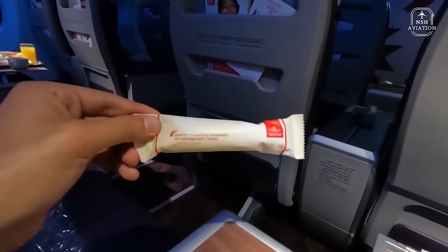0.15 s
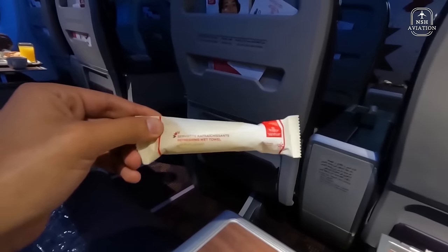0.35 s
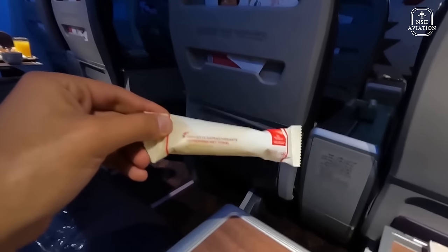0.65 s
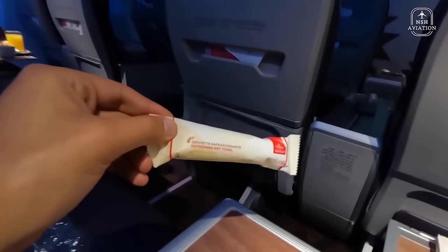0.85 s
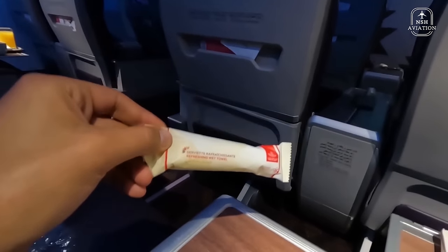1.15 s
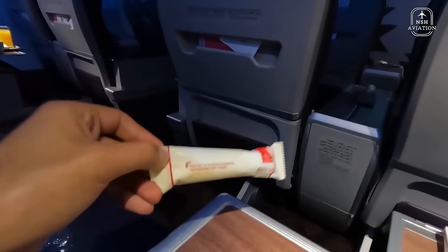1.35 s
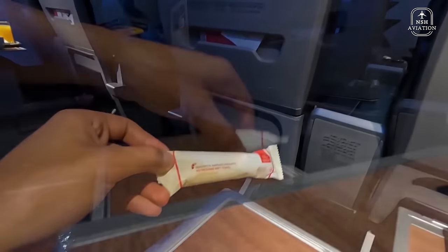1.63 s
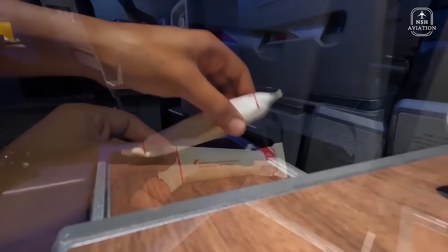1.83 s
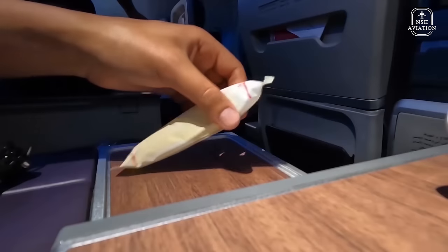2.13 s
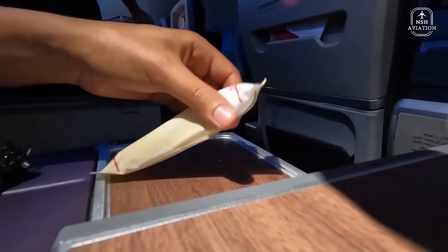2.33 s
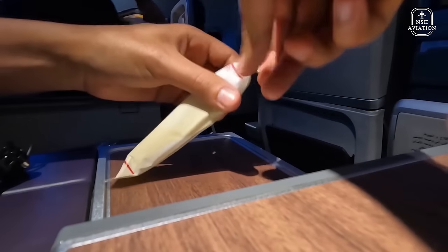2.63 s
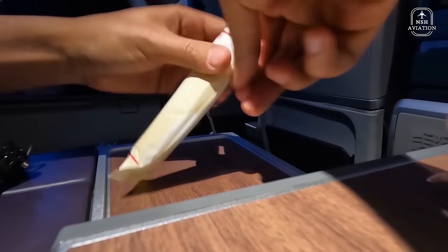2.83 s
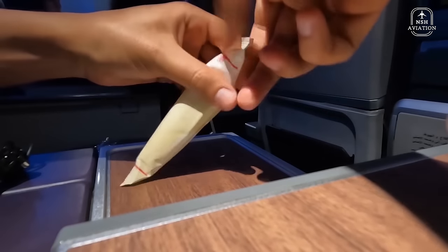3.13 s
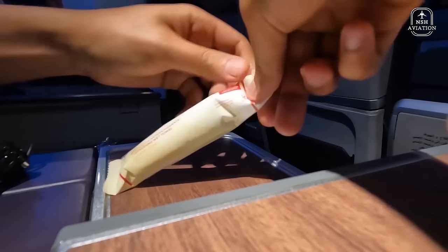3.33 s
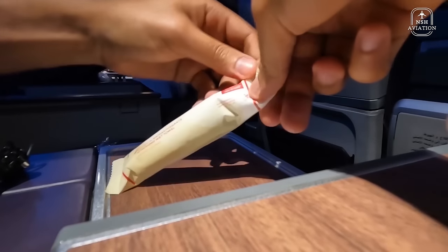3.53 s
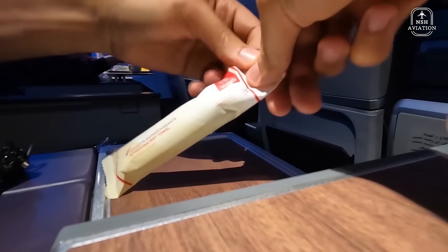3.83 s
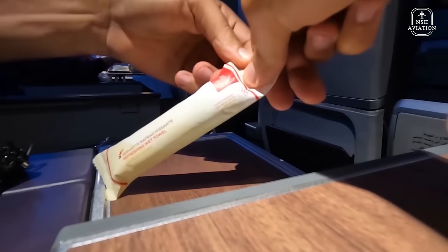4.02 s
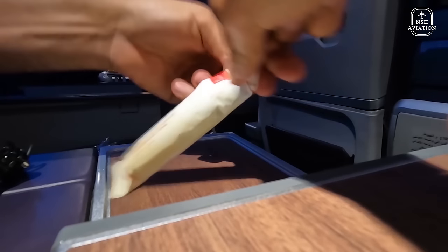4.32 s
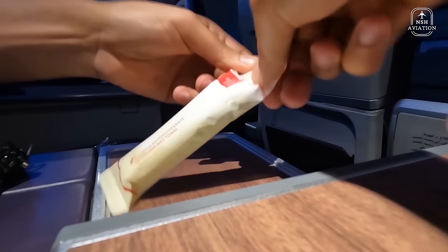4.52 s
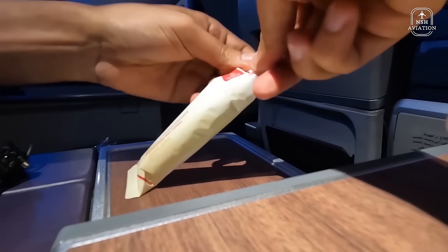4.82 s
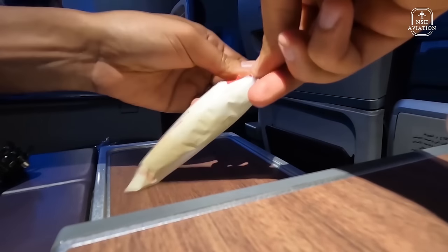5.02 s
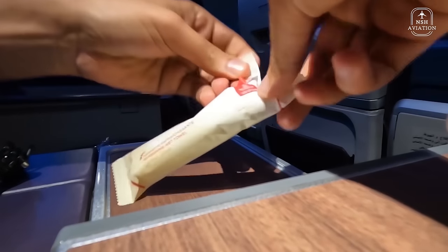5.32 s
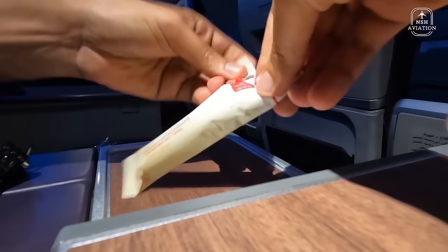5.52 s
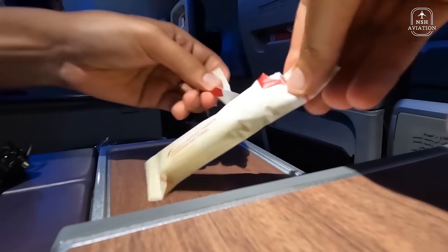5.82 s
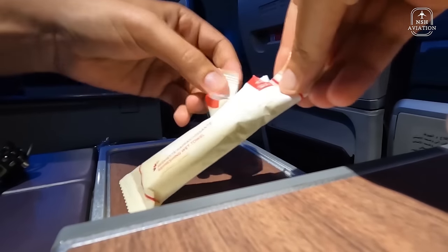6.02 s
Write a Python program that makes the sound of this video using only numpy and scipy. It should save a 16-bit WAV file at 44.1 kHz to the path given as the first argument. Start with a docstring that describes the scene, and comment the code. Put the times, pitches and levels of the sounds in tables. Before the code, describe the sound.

Inside a jet in cruise, a deep, soft air roar and low engine hum run throughout. Close to the microphone, a plastic wrapper gives sparse sharp snaps, then busier crinkling. Near two seconds the wide stereo cabin fades into a quieter centred one, which slowly regains level. Faint cutlery clinks come from seats away, clearest shortly before five seconds.

```python
"""Air roars along the skin of a jet cabin in cruise: noise coloured by the wall, its octave bands swelling and flickering.
Under it an engine shaft hums, a wavering sine. Close by, fingers crackle a plastic wrapper: noise bursts and dense
grains ring in resonances of the film. Some seats away cutlery clinks, in metal modes blurred by rattling.
A wide stereo view fades out near 2 s while a centred view, with the engines turning a little faster, fades in."""
import sys
import numpy as np
from scipy import signal
from scipy.fft import rfft, irfft, next_fast_len
from scipy.io import wavfile
from scipy.ndimage import uniform_filter1d

SR = 44100
rng = np.random.default_rng(int(sys.argv[2]) if len(sys.argv) > 2 else 0)


def log_audio(samples):
    """Write samples as a 16-bit WAV file to the path given in sys.argv[1]."""
    # one column per channel
    frames = np.atleast_2d(samples).T
    # limit to full scale, then quantise
    limited = np.clip(frames, -1, 1)
    pcm = np.round(limited * 32767).astype(np.int16)
    wavfile.write(sys.argv[1], SR, pcm)


N = 271656

# fade of the wide stereo view, whose last row ends it: time_s, level_db
WIDE_VIEW_FADE = [(0, 0), (1.6, -0.5), (1.75, -2.5), (1.87, -7), (1.97, -12.5), (2.0, -55)]
WIDE_VIEW_END_S = WIDE_VIEW_FADE[-1][0]
LEFT_RIGHT = np.array([[1], [-1]])  # side noise enters the two channels with opposite signs


def undb(db):
    """Decibels to gain."""
    return 10 ** (np.asarray(db) / 20)


def over_hz(table, hz, column=1):
    """Read a spectrum on a log-frequency axis."""
    table = np.array(table)
    return np.interp(np.log(np.maximum(hz, 1)), np.log(table[:, 0]), table[:, column])


def fade(table):
    """Gain curve over time, interpolated in decibels."""
    s, db = np.transpose(table)
    return undb(np.interp(np.arange(N) / SR, s, db, left=-120, right=db[-1]))


def walk(rate):
    """Random levels held 1 / rate seconds and smoothed twice; spread near 1."""
    held = int(SR / rate)
    steps = np.repeat(rng.standard_normal(N // held + 1), held)
    smooth = uniform_filter1d(uniform_filter1d(steps, held), held)
    return 1.3 * smooth[:N]


def add(out, sound, s):
    """Mix a short sound in at time s."""
    i = int(s * SR)
    sound = sound[..., :N - i]
    out[:, i:i + sound.shape[-1]] += sound


def band(x, hz, width):
    """One resonance, its width in Hz."""
    return signal.lfilter(*signal.iirpeak(min(hz, .4 * SR), hz / width, SR), x)


def band_twice(x, hz, width):
    """The same resonance twice in a row, for steeper skirts."""
    return band(band(x, hz, width), hz, width)


def roar(colour, db, wide, swell_db=-0.4, flicker_db=0.15, lean_db=3.5):
    """Turbulent air shakes the wall panels; octave bands swell together and flicker alone."""
    # stereo width of the wide view: frequency_hz, diffuse_side_minus_mid_db
    width = [(60, -48), (140, -52.5), (210, -30), (330, -21.5), (500, -8), (1160, -5.5), (2700, -3),
             (8000, 3)]
    size = next_fast_len(N)
    hz = np.fft.rfftfreq(size, 1 / SR)
    tint = undb(over_hz(colour, hz))
    mid = rfft(rng.standard_normal(size)) * tint
    side = rfft(rng.standard_normal(size)) * tint * wide * undb(over_hz(width, hz))
    # the wall is on the left; the bass bends round the microphone body
    lean = undb(wide * lean_db / 2 * hz ** 2 / (hz ** 2 + 450 ** 2))
    ears = np.array([mid * lean + side, mid / lean - side])

    octave = np.log2(np.maximum(hz, 1) / 20)
    swell = walk(0.66)
    out = 0
    for k in range(11):
        share = np.cos(np.pi / 2 * np.clip(octave - k, -1, 1)) ** 2  # overlapping octave bands
        level = undb(swell_db * swell + flicker_db * walk(6))
        out = out + irfft(ears * share, size)[:, :N] * level
    return out * undb(db) / np.sqrt(np.mean(out ** 2))


def shaft(hz, db, waver_db=1.77, drift=0.17):
    """Fan shaft imbalance: a once-per-turn hum carried by the airframe, nearly steady in pitch."""
    turn = 2 * np.pi * (hz * np.arange(N) / SR + rng.random()) + drift * walk(2.61)
    return np.sqrt(2) * undb(db + waver_db * walk(7.6)) * np.sin(turn)


def dips(dip_s=0.024):
    """Gain of the hum, sinking for a moment at each dip."""
    # brief dips of the hum in the centred view: time_s, depth_db
    hum_dips = [(2.47, -2), (2.96, -17), (3.26, -6), (3.46, -11), (3.96, -12), (4.88, -27), (5.56, -5)]
    t = np.arange(N) / SR
    return undb(sum(db * np.exp(-((t - s) / dip_s) ** 2) for s, db in hum_dips))


def cutlery(rise_s=0.0028, blur_hz=220, share_db=2.0):
    """Metal touched some seats away: rings swell, last while it rattles, then die; rattling blurs them into noise."""
    # ringing modes, one list for each piece: frequency_hz, level_db, t60_s
    piece_modes = [
        [(3020, 9.5, 0.05), (3520, -6, 0.09), (5310, 4, 0.12), (7400, -10, 0.18), (9577, -19, .08),
         (10380, -17, 0.116), (11910, -17, 0.13), (14520, -13, .2)],
        [(3650, 3.5, .12), (5330, -4.5, 0.16), (6570, -6, .1), (8940, -17, .1), (10500, -22, .1),
         (11600, -18, .12)],
        [(6665, -6, 0.1), (12000, -24, .08)],
        [(5750, -4, .08), (8600, -3, 0.39), (9800, -9, .2), (10250, -7, .3)],
        [(7950, -0.5, .1), (8600, -5, .1)],
    ]
    # names of the pieces, in the order of those lists
    piece_names = ("first", "second", "third", "fourth", "fifth")
    # rattles: time_s, piece, length_s, level_db (mode levels add to it), roughness from 0 to 1
    clinks = [(2.02, "fifth", .05, -77, .9), (2.16, "fifth", .035, -73, .7),
              (2.328, "second", .01, -70, .6), (2.375, "second", 0.035, -69, 0.5),
              (2.622, "fourth", .01, -71, .6), (2.797, "second", 0.04, -66.5, .45),
              (3.04, "second", 0.061, -64.5, 0.6), (3.69, "fourth", .01, -69, .6),
              (4.827, "first", 0.012, -45.5, 0.5), (4.849, "first", .006, -53, .6),
              (4.876, "first", .01, -56, .6), (5.901, "third", 0.032, -49, 0.8)]
    out, t = np.zeros((2, N)), np.arange(9000) / SR
    blur = int(SR / blur_hz)
    for s, piece, length_s, db, rough in clinks:
        hz, mode_db, t60 = np.array(piece_modes[piece_names.index(piece)]).T[:, :, None]
        gain = undb(db + mode_db + share_db * rng.standard_normal(hz.shape))
        noise = rng.standard_normal((2, len(hz), len(t)))
        real, imaginary = uniform_filter1d(noise, size=blur) * np.sqrt(blur / 2)
        swing = np.sqrt(1 - rough ** 2) + rough * (real + 1j * imaginary)
        decay = np.exp(-np.log(1000) * np.maximum(t - length_s, 0) / t60)
        ring = (1 - np.exp(-t / rise_s)) * decay
        tone = np.exp(2j * np.pi * (hz * t + rng.random(hz.shape)))
        add(out, np.sum(gain * ring * np.imag(swing * tone), axis=0), s)
    return out


def film(push, low_hz, high_hz, high_db, more_body_db=0, body_db=-4, follows=0.93):
    """The plastic film: two rings set by the fold over a broad snap, which is weak where the fold sounds dull."""
    low = band_twice(push, low_hz, 0.44 * low_hz)
    high = band_twice(push, high_hz, 0.26 * high_hz)
    body_gain = undb(body_db + more_body_db + follows * min(high_db, 0))
    return low + undb(high_db) * high + body_gain * band_twice(push, 3300, 4600)


def effort(held_db=-65, press_db_per_s=405, let_go_db_per_s=225.5):
    """Rustle level in dB over time: each squeeze presses quickly, holds and lets go."""
    # fingers squeezing the film: hold_start_s, hold_s, rustle_db
    squeezes = [(0.0, 0.011, -54), (1.393, .01, -57), (1.518, 0.025, -52.5), (1.817, .01, -67),
                (1.955, .01, -71), (2.285, 0.027, -65), (2.616, .03, -69), (2.772, 0.014, -60.5),
                (2.888, .03, -70), (2.948, .02, -74), (3.067, 0.06, -63.5), (3.27, 0.025, -55),
                (3.329, 0.021, -53), (3.40, 0.053, -62.5), (3.828, 0.035, -56), (4.15, 0.032, -63.5),
                (4.42, 0.052, -49.5), (4.602, 0.076, -58), (4.715, .03, -59), (4.83, 0.033, -53),
                (5.006, .01, -57.5), (5.147, 0.045, -57.5), (5.352, 0.062, -57.5), (5.64, 0.06, -58),
                (5.763, 0.072, -53), (5.867, .01, -65), (6.10, 0.044, -69)]
    t = np.arange(N) / SR
    # the wrapper merely held rustles in the wide view only
    power = (undb(held_db) * fade(WIDE_VIEW_FADE)) ** 2 + 1e-12
    for s, hold_s, db in squeezes:
        press = press_db_per_s * np.maximum(s - t, 0)
        let_go = let_go_db_per_s * np.maximum(t - s - hold_s, 0)
        power = power + undb(db - press - let_go) ** 2
    return 10 * np.log10(power)


def rustle(level_db, per_s=1500, scatter_db=2.0, patchy_db=3):
    """Dense tiny creases in three patches of film, each with its own rings."""
    out = 0
    for low_hz, high_hz, high_db in ((2900, 8200, -8.0), (3680, 4600, -12.0), (5200, 7800, -12.0)):
        when, size, sign = rng.random((3, N))
        sizes = undb(-scatter_db * np.log(size + 1e-9))
        grains = (when < per_s / SR) * sizes * np.sign(sign - .5)
        out = out + film(grains, low_hz, high_hz, high_db) * undb(patchy_db * walk(35))
    return undb(level_db) * out / np.sqrt(np.mean(out ** 2))


def creaks(edge_s=0.0032, grain_db=2.5, spread=.5):
    """Stick-slip grains in stretched film feed one narrow ring."""
    # creaks of the film: start_s, length_s, level_db, ring_hz, width_hz
    creak_rows = [(0.004, 0.024, -52.5, 7600, 3000), (0.398, .022, -58, 6000, 2000),
                  (0.447, .015, -56, 8200, 3000), (1.531, .012, -52, 7000, 900),
                  (1.595, .015, -60, 6500, 2500), (1.81, .012, -61, 6500, 2500),
                  (3.257, 0.031, -53, 6960, 800), (3.262, .02, -59, 4800, 500),
                  (3.283, 0.021, -54, 4750, 500), (3.316, .03, -57, 7800, 1200),
                  (3.325, 0.018, -53, 4800, 600), (3.805, .02, -57, 6000, 1800),
                  (3.847, .022, -56, 7600, 1200), (3.874, .012, -59, 5500, 1500),
                  (4.464, .012, -54.5, 7000, 1500), (4.994, .02, -58, 6200, 1200),
                  (5.764, .012, -56, 7200, 1200)]
    out, t = np.zeros((2, N)), np.arange(3000) / SR
    for s, length_s, db, hz, width in creak_rows:
        mid, side, size = rng.standard_normal((3, len(t)))
        grains = mid + (s < WIDE_VIEW_END_S) * spread * side * LEFT_RIGHT
        grain_gain = undb(grain_db * uniform_filter1d(size, size=60) * np.sqrt(60))
        ring = band_twice(grains * grain_gain, hz, width)
        shape = (1 - np.exp(-t / edge_s)) * np.exp(-np.maximum(t - length_s, 0) / edge_s)
        add(out, undb(db) * shape * ring / np.sqrt(np.mean(ring ** 2)), s)
    return out


def strays(level_db, count=400, per_s=45, over_rustle_db=2.5, scatter_db=2.5):
    """Small snaps at random moments, as strong as the fingers press; rows like those of the snaps."""
    when, size, low, high = rng.random((count, 4)).T
    s = np.cumsum(-np.log(when + 1e-9) / per_s)
    rustle_db = np.interp(s, np.arange(N) / SR, level_db)
    db = rustle_db + over_rustle_db - scatter_db * np.log(size + 1e-9)
    low_hz, high_hz = 3000 * (1 + 0.13 * low), 5550 * (1 + 0.2 * high)
    rows = np.transpose([s, db, low_hz, high_hz, -8.5 + 0 * s])
    return list(rows[(s < N / SR) & (db > -72)])


def wrapper(level_db, rise_s=.0004, crack_s=0.0011, kick=12, tail_s=0.009, crinkle_db=-13.5, grain_db=3.5,
            spread=0.3, left_late_s=0.000014, shade_hz=5500, top_hz=9000):
    """A fold buckles with a quick ringing crack and broad grainy crinkles; only the wide view hears them spread out."""
    # wrapper snaps: time_s, crack_peak_db, low_ring_hz, high_ring_hz, high_ring_minus_low_db
    snaps = [(0.0184, -38, 3050, 6200, 10), (0.397, -46, 3060, 6000, 6), (0.4492, -36, 6600, 8700, 0),
             (0.8294, -36, 3150, 5900, -7), (1.1751, -26.5, 6200, 9400, 3), (1.3958, -16.5, 5070, 7000, -3),
             (1.4945, -45, 5500, 7200, 0), (1.5257, -14, 5060, 8360, 0), (1.5262, -17.5, 3000, 6860, 1),
             (1.5944, -42, 3260, 6500, 0), (1.8094, -44, 4500, 6460, 3), (1.9602, -19.5, 2200, 7200, -5),
             (1.9634, -40, 3870, 11900, 3), (1.9764, -40, 2500, 7650, -7), (2.228, -53, 3400, 5500, -12),
             (2.2802, -41.5, 3150, 5560, 4), (2.3017, -38, 3330, 5780, -18), (2.613, -44, 4000, 5910, -3),
             (2.6618, -49, 3800, 5880, -6), (2.678, -50, 3900, 7000, -6), (2.775, -39, 4100, 6700, -2),
             (2.7844, -41, 3570, 6650, -1), (2.883, -38, 3080, 6300, -29), (2.951, -43, 3500, 5810, -3),
             (3.157, -43, 3500, 6500, -5), (3.2675, -35, 4700, 6800, 3), (3.271, -23.5, 4800, 6450, 6),
             (3.2775, -47, 4700, 7000, 2), (3.286, -45, 4700, 6500, -6), (3.29, -29, 3200, 4800, -2),
             (3.2955, -45, 4700, 6500, -8), (3.3002, -37, 3320, 7260, -14), (3.3235, -31, 2800, 4500, -8),
             (3.3262, -26, 2290, 8000, -6), (3.3295, -29, 4700, 7400, -2), (3.3322, -30, 4770, 8050, -6),
             (3.337, -35, 4700, 7500, -7), (3.363, -50, 4500, 6000, -2), (3.3864, -40, 3070, 6750, -6),
             (3.4171, -45, 4800, 7500, -5), (3.4635, -33.5, 3420, 6700, -9), (3.4747, -36, 3220, 7700, -18),
             (3.8104, -38, 5000, 7500, -5), (3.814, -34, 4500, 6200, 5), (3.8562, -25, 2800, 7400, -3),
             (3.8754, -32, 3940, 5770, -4), (4.1066, -37.5, 3000, 5900, -22), (4.1675, -44, 4510, 9000, -5),
             (4.2564, -39, 3000, 5770, -5), (4.399, -43, 4000, 8000, -3), (4.4048, -36, 3180, 6790, -20),
             (4.4114, -25.5, 3210, 5500, -5), (4.4177, -25, 3280, 5850, -5), (4.4244, -27, 3400, 6530, -10),
             (4.442, -33, 3000, 4200, -6), (4.4472, -27.5, 2980, 6810, -11), (4.452, -32, 3040, 7170, -6),
             (4.4703, -33, 4100, 6720, -3), (4.4855, -41, 4830, 6500, -10),
             (4.4945, -29.5, 3400, 5900, -24), (4.6345, -34, 3400, 5600, -21),
             (4.693, -34.5, 3600, 5200, -8), (4.697, -45, 4200, 6300, -4), (4.7228, -37, 4500, 9300, -5),
             (4.858, -41, 4500, 7500, -3), (4.889, -43, 5000, 7500, 0), (5.0057, -21.5, 3430, 5760, -12),
             (5.0704, -40, 3050, 8500, -1), (5.122, -43, 4500, 5600, -2.5), (5.128, -40, 3500, 5200, 2),
             (5.1642, -38, 4290, 5600, -6), (5.2063, -39, 3160, 6470, -6), (5.3323, -40, 2600, 5510, -20),
             (5.3496, -32.5, 3370, 6670, -26), (5.405, -40, 3500, 5000, -8), (5.637, -32, 3420, 5600, -16),
             (5.763, -26, 3740, 6900, 3), (5.7944, -43, 3510, 6800, -1), (5.8044, -21, 3160, 7400, -2),
             (5.8052, -26, 4400, 5860, -8), (5.8405, -43, 4500, 6500, 0), (5.865, -36, 4500, 6300, 3),
             (6.109, -37.5, 3330, 7160, -18)]
    # resonances of the crinkle: frequency_hz, width_hz, level_db
    crinkle_bands = [(2520, 3100, -1), (4800, 5600, 0), (11100, 2700, -12.5)]
    # the wrapper is left of the wide view, the microphone body shades the right port: time_s, treble_left_minus_right_db
    shade_rows = [(0.4, 10), (1.4, 5), (1.53, 3), (1.96, 21)]
    out, t = np.zeros((2, N)), np.arange(2000) / SR
    dull, hz = signal.butter(1, top_hz, fs=SR), np.fft.rfftfreq(len(t), 1 / SR)
    treble = 1 / (1 + (shade_hz / np.maximum(hz, 1)) ** 4)
    late = np.exp(-2j * np.pi * hz * left_late_s)
    for s, db, low_hz, high_hz, high_db in list(snaps) + strays(level_db):
        mid, side, size, fine = rng.standard_normal((4, len(t)))
        mid[int(rise_s * SR)] = kick  # the break of the fold is one clean kick
        wide = s < WIDE_VIEW_END_S
        sides = wide * spread * side * LEFT_RIGHT
        rise = 1 - np.exp(-t / rise_s)

        push = (mid + sides) * rise * np.exp(-t / crack_s)
        crack = film(push, low_hz, high_hz, high_db, more_body_db=wide * -5)
        if wide:  # a brighter edge
            crack = crack + undb(-7.5) * band(push, 6000, 6000)
        else:
            crack = signal.lfilter(*dull, crack)
        crack = crack / np.max(np.abs(crack.mean(axis=0)))

        # crinkle against the crack; the wide view hears drier snaps
        grain_level = grain_db * uniform_filter1d(size, size=40) * np.sqrt(40)
        grain_gain = undb(crinkle_db + wide * -8.5 + grain_level)
        grain = (fine + sides) * grain_gain * rise * np.exp(-t / tail_s)
        crinkle = sum(undb(g) * band_twice(grain, f, w) for f, w, g in crinkle_bands)
        sound = crack + crinkle
        if wide:  # the left port hears it slightly late, the right port with less treble
            shade_db = np.interp(s, *np.transpose(shade_rows)) * treble
            sound = irfft(rfft(sound) * np.array([late, undb(-shade_db)]), len(t))
        add(out, undb(db) * sound, s)
    return out


def scene():
    """Two views of the cabin, cross-faded, with the wrapper close by and the cutlery some seats away."""
    # fade of the centred view: time_s, level_db
    centre_view_fade = [(1.7, -49.5), (2.0, -13), (2.5, -11), (3.0, -8), (3.5, -5), (4.0, -2), (4.5, -0.5),
                        (5.3, 0.2), (5.7, 0), (6.16, 0.1)]
    # colour of the roar through the cabin wall, wide view: frequency_hz, relative_db_per_hz
    wide_colour = [(20, -6), (45, 1), (88, -3), (116, 1.5), (220, -11.5), (370, -10), (450, -16.5),
                   (680, -13.5), (1020, -15), (1900, -27.5), (3200, -39.5), (5000, -57), (7500, -58.5),
                   (10000, -71.5), (12500, -75), (13500, -100)]
    # the same in the centred view: frequency_hz, relative_db_per_hz
    centre_colour = [(20, -11.5), (50, -2.5), (90, -6), (118, -3.5), (200, -9.5), (250, -13), (365, -13),
                     (400, -19), (500, -19), (660, -13.5), (820, -14), (1010, -19.5), (1150, -24.5),
                     (1900, -33), (3200, -47), (5000, -61.5), (7500, -65), (10000, -76), (12500, -80.5),
                     (13500, -105)]
    # the centred roar is thinner around 700 Hz, most of all near 2.3 s: time_s, level_db of that band
    middle_fade = [(1.9, -3), (2.3, -6), (2.8, -3), (3.5, -4)]

    wide = fade(WIDE_VIEW_FADE) * (roar(wide_colour, db=-21.5, wide=0.59) + shaft(hz=62.2, db=-21))
    air = roar(centre_colour, db=-22, wide=0)
    air = air - (1 - fade(middle_fade)) * band(air, 700, 600)
    centre = fade(centre_view_fade) * (air + dips() * shaft(hz=67.8, db=-19))
    fingers_db = effort()
    return wide + centre + cutlery() + rustle(fingers_db) + creaks() + wrapper(fingers_db)


def record(dry, mic_hz=11500, top_hz=15700, open_s=.004):
    """The sound opens in a few milliseconds; the microphone dulls the treble, which stops at top_hz."""
    opening = np.sin(np.pi / 2 * np.minimum(np.arange(N) / SR / open_s, 1)) ** 2
    dull = signal.sosfilt(signal.butter(2, mic_hz, fs=SR, output="sos"), dry * opening)
    return signal.sosfilt(signal.ellip(8, .2, 70, top_hz, fs=SR, output="sos"), dull)


dry = scene()
out = record(dry)
log_audio(out)
```